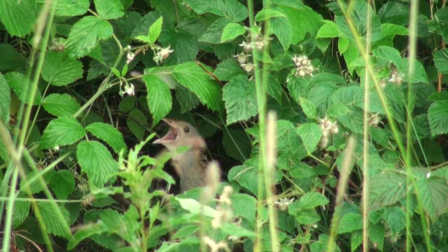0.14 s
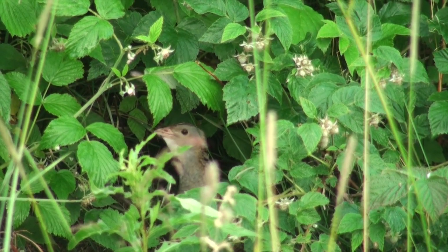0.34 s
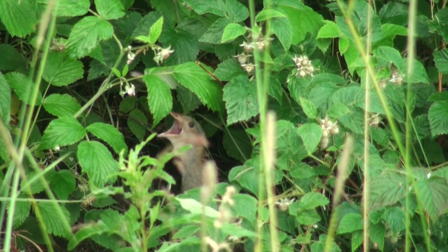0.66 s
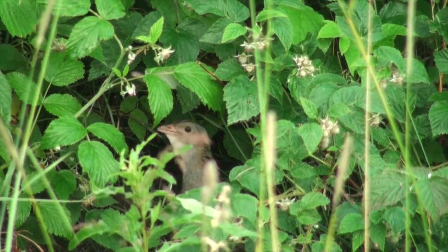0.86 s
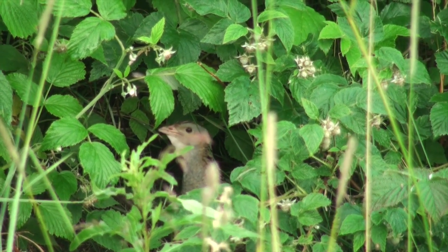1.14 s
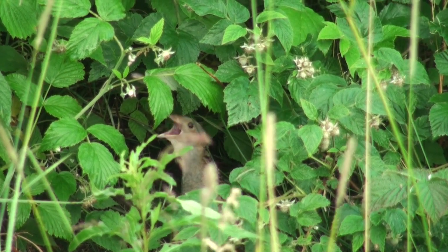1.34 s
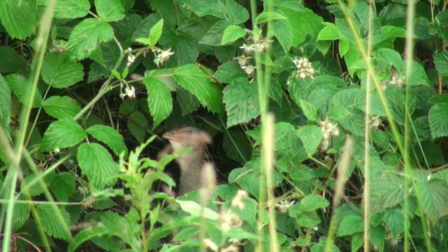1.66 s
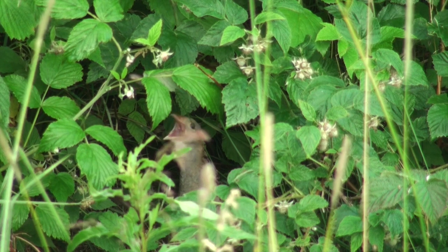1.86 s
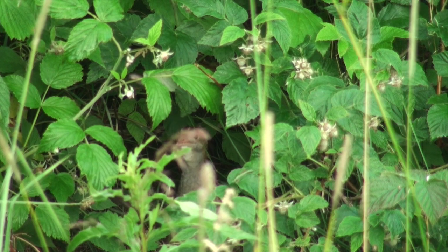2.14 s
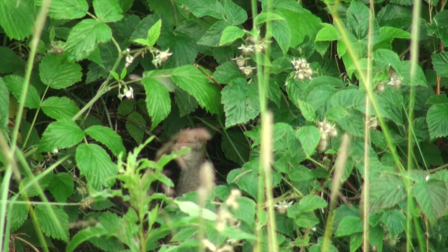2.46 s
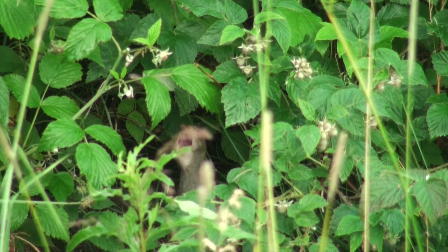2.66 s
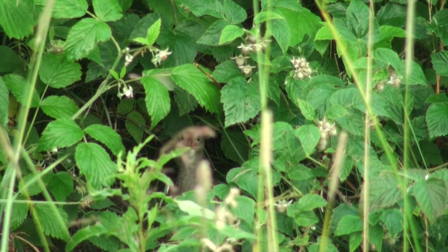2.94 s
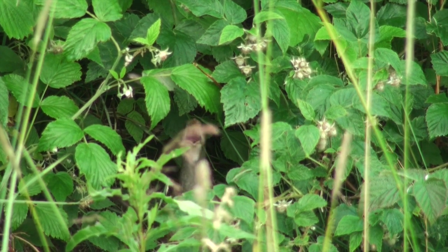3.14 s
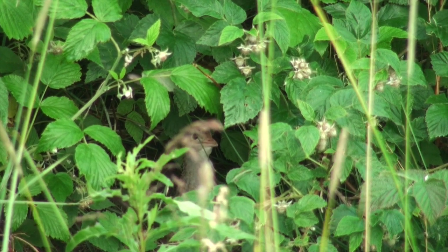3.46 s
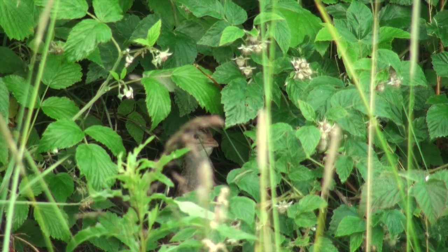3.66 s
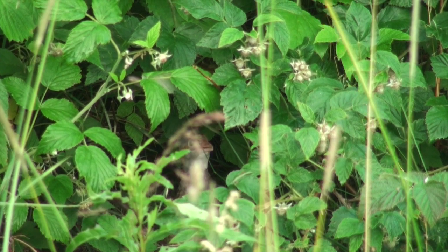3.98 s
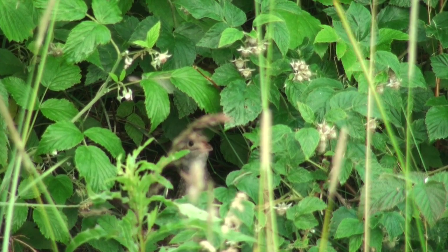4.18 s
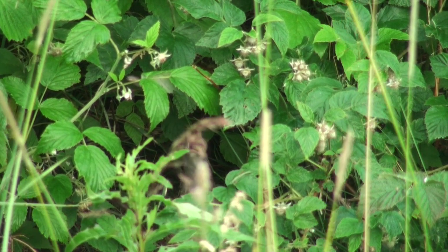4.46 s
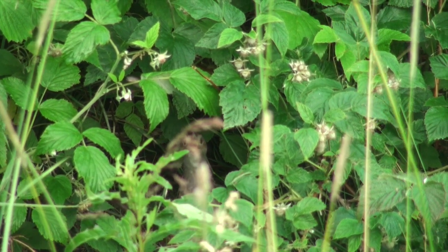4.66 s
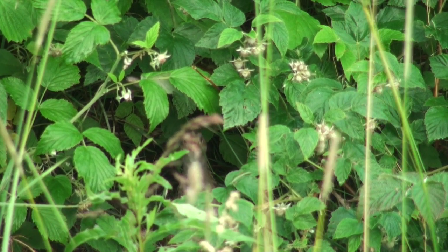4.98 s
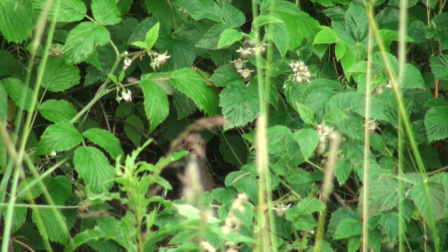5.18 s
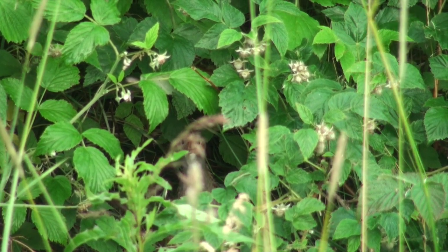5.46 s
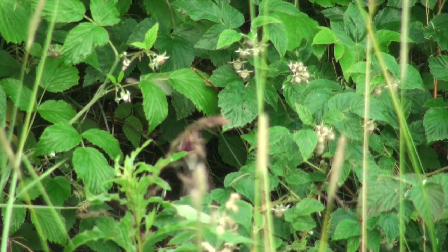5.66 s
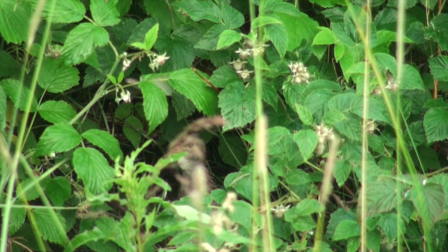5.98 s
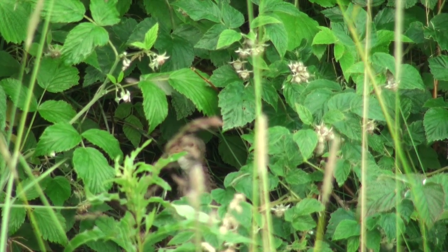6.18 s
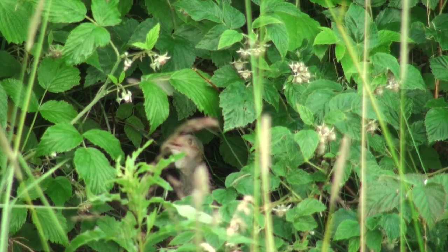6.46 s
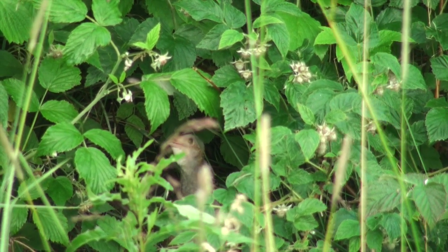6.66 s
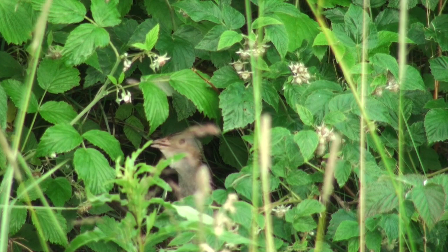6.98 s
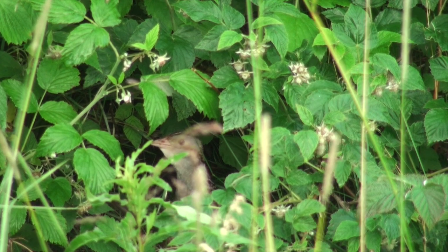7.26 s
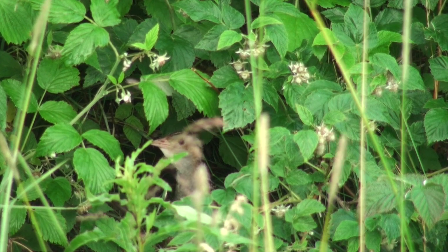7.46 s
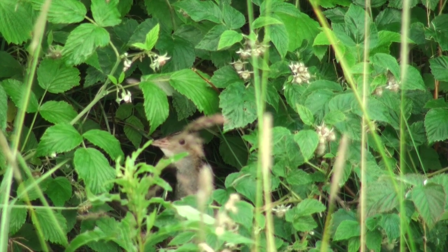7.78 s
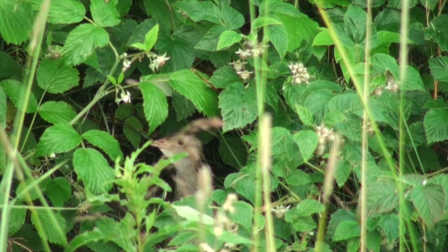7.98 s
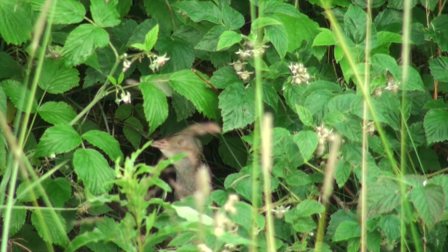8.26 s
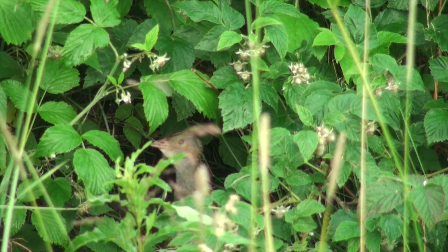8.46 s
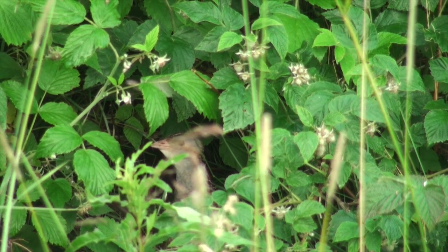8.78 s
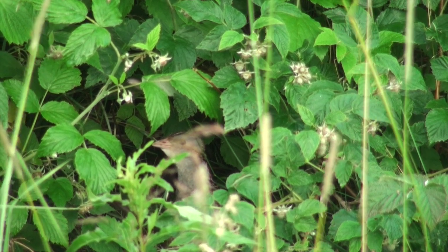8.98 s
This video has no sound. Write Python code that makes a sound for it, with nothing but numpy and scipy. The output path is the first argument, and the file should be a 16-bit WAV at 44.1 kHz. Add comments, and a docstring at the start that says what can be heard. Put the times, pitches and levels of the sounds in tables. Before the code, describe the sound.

A corncrake hidden in brambles gives loud, dry, comb-like rasps in pairs, about two every second and a quarter. A second one far across the meadow rasps in similar pairs, faint and smeared. From about two seconds a small songbird twitters softly in the distance, pauses, then returns near the end. The close bird stops shortly after seven seconds, leaving the far bird and a gently rising haze. Close outdoor microphone, centred birds.

```python
"""Over a faint haze that swells late, a far-off corncrake rasps in doubles, smeared by the meadow grass.
Close by, a second corncrake soon joins in with its own double call from a bramble thicket.
Its rasps are limping runs of about 120 pulses a second: a sharp snap on top of a few swings of the
syrinx (the bird's voice organ), scattered by leaves.
Later a small songbird twitters in the distance with gliding whistles, trills and soft falling notes."""
import sys
import numpy as np
from scipy import signal
from scipy.io import wavfile
from scipy.ndimage import uniform_filter1d

SR = 44100
rng = np.random.default_rng(int(sys.argv[2]) if len(sys.argv) > 2 else 0)


def to_wav(s):
    """Save 16-bit WAV."""
    ch = np.atleast_2d(s).T  # columns
    pcm = np.round(np.clip(ch, -1, 1) * 32767)  # PCM
    wavfile.write(sys.argv[1], SR, pcm.astype(np.int16))


N = 402191  # length in samples


def amp(db):
    """Turns decibels into a gain."""
    return 10 ** (np.asarray(db) / 20)


def evened(x):
    """Scales a sound to rms 1."""
    return x / np.sqrt(np.mean(x ** 2) + 1e-20)


def add(mix, start_s, sound):
    """Mixes a sound in at its start time; what runs past the end is cut off."""
    part = mix[max(round(start_s * SR), 0):][:len(sound)]
    part += sound[:len(part)]


def colour(x, points, size=2048):
    """Filters to an outline of (pitch_hz, level_db) points, with no ringing ahead of the sound."""
    points_hz, points_db = np.transpose(points)
    grid_hz = abs(np.fft.fftfreq(size, 1 / SR))
    outline_db = np.interp(np.log(grid_hz + 1), np.log(points_hz), points_db)
    log_gain = np.log(amp(outline_db))
    # The Hilbert transform supplies the phase that makes the filter respond only after its input.
    taps = np.fft.ifft(np.exp(np.conj(signal.hilbert(log_gain)))).real
    return signal.oaconvolve(x, taps)[:len(x)]


def echoes(first_s, t60, length_s):
    """Dense random reflections, of total energy 1, that fade by 60 dB in t60 seconds."""
    t = np.arange(int(length_s * SR)) / SR
    fade = amp(-60 * t / t60)
    onset = np.clip((t - first_s) * SR / 10, 0, 1)  # rises over ten samples
    taps = rng.standard_normal(len(t)) * fade * onset
    return taps / np.linalg.norm(taps)


def haze(lift_db=3, side_db=-26, hum_hz=50, hum_db=-60.5):
    """Filtered noise, nearly alike on both sides, plus a far rush that rises late and a faint low hum."""
    # Tone of the distant wash: pitch_hz [Hz], relative level_db [dB per Hz]
    wash_tone = [(25, -15), (50, -8.5), (76, -10), (102, -7.5), (175, -13), (260, -7), (450, -3), (677, -6),
                 (1020, -7), (2280, -24), (3200, -15), (4610, -18.5), (7500, -26.5), (16000, -32.5)]
    # Loudness of the wash before the lift: time_s [s], level_db [dB]
    wash_loudness = [(0, -53.5), (1.3, -53), (2, -53), (3.2, -54), (5.7, -56.5), (9.12, -52)]
    # Tone of the far-off rush: pitch_hz [Hz], relative level_db [dB per Hz]
    rush_tone = [(150, -19.5), (400, -9.5), (600, -3.5), (1250, -5.5), (1900, -25.5), (5000, -31),
                 (15000, -49)]
    # Loudness of the rush: time_s [s], level_db [dB]
    rush_loudness = [(0, -69), (6.9, -63), (7.4, -53.5), (8.4, -50.5), (9.12, -50)]

    t = np.arange(N) / SR
    mid = evened(colour(rng.standard_normal(N), wash_tone, size=8192))
    side = evened(colour(rng.standard_normal(N), wash_tone, size=8192))
    # The side part has opposite signs left and right, which gives a little width.
    wash = mid + amp(side_db) * np.array([side, -side])
    wash = wash * amp(lift_db + np.interp(t, *np.transpose(wash_loudness)))

    rush = evened(colour(rng.standard_normal(N), rush_tone))
    rush = rush * amp(np.interp(t, *np.transpose(rush_loudness)))
    hum = amp(hum_db) * evened(np.sin(2 * np.pi * hum_hz * t))
    return wash + rush + hum


def pulse_times(count, rate, drag_s, phase=.86):
    """Pulses start hurried, fall into a limp with two long gaps in five, and drag at the end."""
    limp = .401  # cycles per pulse; phase is where the limp starts, in turns
    k = np.arange(round(count))
    sway_s = .0012 * np.minimum(k / 7, 1) ** 2 * np.sin(2 * np.pi * (limp * k + phase))
    hurry_s = .0026 * k / 2.2 * np.exp(1 - k / 2.2 - (k / 8) ** 2)
    return k / rate + sway_s - hurry_s + drag_s * np.exp(k - k[-1])


def rival(rate=118, call_s=.205, call_db=-40, swell_s=0.095, start_db=-7, direct=0.31, tail_db=-5):
    """Each far pulse is a noise burst: the grass takes the low notes and smears the rest."""
    # When the far bird's rasps begin, in pairs: start_s [s]
    call_starts = [.02, 0.698, 1.234, 1.914, 2.431, 3.107, 3.678, 4.408, 4.903, 5.531, 6.077, 6.682, 7.215,
                   7.896, 8.413, 9.049]
    # Tone left over after the distance: pitch_hz [Hz], relative level_db [dB per Hz]
    far_tone = [(1000, -39.5), (2000, -18), (2600, -30.5), (3300, -11.5), (3700, -17), (4200, -7.5),
                (5200, -6.5), (5700, -11.5), (6400, -0.5), (6900, -8), (7500, -19), (8300, -34.5),
                (12000, -49)]

    out = np.zeros(N)
    for start_s in call_starts:
        call = np.zeros(SR // 2)
        for at_s in pulse_times(call_s * rate, rate, drag_s=0.0044, phase=rng.random()):
            # The call swells to its middle and sinks again.
            effort_db = start_db * ((at_s - swell_s) / swell_s) ** 2
            burst = direct * echoes(first_s=0, t60=0.0052, length_s=1 / 20)
            burst += echoes(first_s=0.0028, t60=0.074, length_s=1 / 20)
            add(call, at_s, amp(effort_db) * burst)
        # Set each call's loudness as it will be after the far tone is applied.
        energy = np.sum(colour(call, far_tone) ** 2)
        add(out, start_s, amp(call_db) * call * np.sqrt(call_s * SR / energy))
    tail = signal.fftconvolve(out, echoes(first_s=0.0044, t60=0.65, length_s=1))[:N]
    return colour(out + amp(tail_db) * tail, far_tone)


def pulse(force, tension, syrinx_hz=915, glide_hz=290, swing_s=0.005, fullness=0.94, snap_hz=6100,
          snap_s=0.001, snap_width_s=0.00023, ping_hz=9800, ping_db=-17, rough_db=-27):
    """One opening of the syrinx: a few harmonic-rich swings that rise in pitch, a snap near their start."""
    # How strongly throat and open bill pass the harmonics: pitch_hz [Hz], level_db [dB]
    throat_tone = [(700, -15.5), (1050, -11.5), (1450, -12), (2080, 1.5), (2500, -10), (3100, -16),
                   (3600, -40), (4050, -14), (5000, -12), (6500, -23), (7600, -25.5), (10000, -27),
                   (14000, -55.5)]

    t = np.arange(320) / SR
    # Each pulse differs a little from the next.
    pitch, size, snap_pitch, snap_size, snap_phase = rng.standard_normal(5)
    age = np.minimum(t / swing_s, 1)
    hz = tension * (syrinx_hz + glide_hz * age) * (1 + .015 * pitch)
    wobble = 0.011 * evened(uniform_filter1d(rng.standard_normal(len(t)), 25))
    turns = np.cumsum(hz) / SR + wobble

    swings = np.zeros(len(t))
    for harmonic in range(1, 14):
        level_db = np.interp(harmonic * hz, *np.transpose(throat_tone))
        swings += amp(level_db) * np.cos(2 * np.pi * harmonic * turns)
    swings += amp(rough_db) * rng.standard_normal(len(t))
    swings *= abs(np.sin(np.pi * age)) ** fullness  # swells and dies within swing_s

    snap = np.cos(2 * np.pi * snap_hz * (1 + .025 * snap_pitch) * t + snap_phase)
    snap += amp(ping_db) * np.sin(2 * np.pi * ping_hz * t)
    snap *= np.exp(-((t - snap_s) / snap_width_s) ** 2 / 2)
    return swings * amp(size / 2) + force * snap * amp(snap_size)


def rasp(bush, count, rate, drag_s, rasp_db=-13.5, leaves_db=-9.5, snap_db=2, spent_db=-7, slack=0.16,
         rise=0.081, turn=0.71, low_cut_hz=730, high_cut_hz=11000):
    """A run of pulses; the head turns, so each rasp meets partly other leaves."""
    # Tone of what the leaves throw back: pitch_hz [Hz], relative level_db [dB]
    leaf_tone = [(400, -21.5), (1000, 2.5), (1500, -11.5), (2050, -1.5), (2600, -0.5), (3120, 13),
                 (3600, -12.5), (3950, 15), (4400, -2), (6500, 6.5), (7600, 8), (10000, 4), (15000, 16)]

    voice = np.zeros(SR // 3)
    times = pulse_times(count, rate, drag_s)
    for k, at_s in enumerate(times):
        # The later the last pulse, the lower and weaker it is.
        spent = drag_s * rate * (k == len(times) - 1)
        tension = 1.015 - rise * np.exp(-k / 5) - slack * spent
        force = amp(snap_db) * min((k + 1) / 3, 1)  # snaps grow over the first three pulses
        add(voice, at_s, amp(spent_db * spent) * pulse(force, tension))
    voice = signal.sosfilt(signal.butter(4, low_cut_hz, "highpass", fs=SR, output="sos"), voice)
    voice = signal.sosfilt(signal.butter(2, high_cut_hz, fs=SR, output="sos"), voice)

    leaves = bush + turn * echoes(first_s=0.0015, t60=0.049, length_s=1 / 10)
    scatter = signal.fftconvolve(voice, leaves / np.linalg.norm(leaves))[:len(voice)]
    voice = voice + amp(leaves_db) * colour(scatter, leaf_tone)
    return amp(rasp_db) * voice * np.sqrt(times[-1] * SR / np.sum(voice ** 2))


def corncrake(thicket_db=-21, echo_db=-31):
    """The near bird, the short ring of the thicket and a faint echo from the meadow's edge."""
    # The near bird's rasps: start_s [s], pulse count, rate [pulses per s], delay of last pulse [s]
    near_rasps = [(0.175, 21, 122.2, 0.0082), (0.6946, 24, 122.9, 0.0046), (1.429, 21, 122.9, 0.0034),
                  (1.9447, 24, 122.5, 0.0044), (2.6526, 22, 122.1, 0.0043), (3.1769, 24, 122.3, 0.0056),
                  (3.8931, 21, 121.2, 0.0075), (4.4052, 23, 123.0, 0.0035), (5.124, 18, 120.2, 0.0041),
                  (5.6449, 23, 122.4, 0.0044), (6.3599, 21, 120.6, 0.0078), (6.8619, 24, 121.9, 0.0033)]
    # Tone of the echoes from thicket and meadow: pitch_hz [Hz], relative level_db [dB]
    echo_tone = [(300, -30.5), (2000, -17), (3200, -4), (4500, 0), (6500, -4.5), (8000, -1), (15000, -14)]

    out = np.zeros(N)
    bush = echoes(first_s=0.0001, t60=0.03, length_s=1 / 10)  # leaves that every rasp meets
    for start_s, count, rate, drag_s in near_rasps:
        add(out, start_s, rasp(bush, count, rate, drag_s))
    space = amp(thicket_db) * echoes(first_s=0.0023, t60=0.028, length_s=1)
    space += amp(echo_db) * echoes(first_s=0.021, t60=1.0, length_s=1)
    return out + colour(signal.fftconvolve(out, space)[:N], echo_tone)


def whistle(length_s, first_hz, last_hz, level_db, trill=False):
    """A gliding sine; a trill also shakes a little unevenly in pitch and is louder on its upstrokes."""
    settle = 1.5  # power of the time left: the glide is fast at first, then settles
    trill_hz, trill_depth_hz, trill_throb_db = 61.9, 260, 2.5
    t = np.arange(int(length_s * SR)) / SR
    unevenness = .5 * evened(uniform_filter1d(rng.standard_normal(len(t)), 600))
    beat = 2 * np.pi * trill_hz * t + unevenness
    hz = last_hz + (first_hz - last_hz) * (1 - t / length_s) ** settle
    hz = hz + trill * trill_depth_hz * np.sin(beat)
    shape = signal.windows.tukey(len(t), .5) * amp(trill * trill_throb_db * np.cos(beat))
    return amp(level_db) * evened(np.sin(2 * np.pi * np.cumsum(hz) / SR) * shape)


def songbird(direct_db=-1.5, wet_db=-7, pitch_spread=0.24, length_spread=0.21, spread_db=2):
    """Slurs and trills stand out of a soft random twitter of falling notes, softened by the bushes."""
    # The clearest slurs: start_s [s], length_s [s], first_hz [Hz], last_hz [Hz], relative level_db [dB]
    clear_slurs = [(2.16, .051, 5040, 4070, -46), (2.277, .047, 3040, 1990, -54.5),
                   (2.336, 0.03, 3050, 1850, -54), (2.351, 0.034, 5700, 4640, -48.5),
                   (2.6, 0.055, 2320, 2150, -50), (2.888, 0.033, 5210, 3000, -38.5),
                   (3.473, 0.19, 2330, 2110, -55), (3.766, 0.015, 4240, 3140, -36),
                   (3.837, 0.015, 4480, 3450, -41.5), (4.1, 0.077, 3300, 3330, -42),
                   (4.16, 0.12, 3350, 2570, -51), (4.649, 0.058, 1990, 1616, -53),
                   (4.857, 0.063, 3580, 4500, -39), (7.729, .07, 4950, 5750, -54),
                   (7.803, 0.0246, 5460, 4380, -47), (7.889, 0.023, 4970, 3980, -41),
                   (8.173, 0.036, 4030, 3100, -43.5), (8.583, 0.03, 4535, 3435, -43),
                   (8.97, 0.018, 5660, 4520, -46.5)]
    # Trills: start_s [s], length_s [s], pitch_hz [Hz], relative level_db [dB]
    clear_trills = [(1.766, 0.042, 3910, -44.5), (2.838, .08, 3560, -50), (4.183, 0.05, 3730, -42.5),
                    (5.353, 0.073, 3450, -44), (7.679, 0.036, 4510, -45.5), (8.265, 0.086, 3550, -45)]
    # Phrases filled with softer twitter: start_s [s], end_s [s]
    twitter_spans = [(2.1, 6.7), (7.599, 9.1)]
    # Typical soft note: notes per s, first pitch, length, relative level, share of its pitch it drops
    notes_per_s, note_hz, note_s, note_db, fall = 5.6, 4920, .04, -49.5, 0.21

    out = np.zeros(N)
    for start_s, length_s, first_hz, last_hz, level_db in clear_slurs:
        add(out, start_s, whistle(length_s, first_hz, last_hz, level_db))
    for start_s, length_s, pitch_hz, level_db in clear_trills:
        add(out, start_s, whistle(length_s, pitch_hz, pitch_hz, level_db, trill=True))
    for phrase_s, end_s in twitter_spans:
        for k, (late, pitch, length, size) in enumerate(rng.uniform(-1, 1, (60, 4))):
            start_s = phrase_s + (k + late / 2) / notes_per_s
            first_hz = note_hz * np.exp(pitch_spread * pitch)
            length_s = note_s * np.exp(length_spread * length)
            if start_s < end_s:
                note = whistle(length_s, first_hz, first_hz * (1 - fall), note_db + spread_db * size)
                add(out, start_s, note)
    wet = signal.fftconvolve(out, echoes(first_s=.003, t60=0.33, length_s=.5))[:N]
    return amp(direct_db) * out + amp(wet_db) * wet


def scene():
    """The haze spreads slightly to both sides; all three birds are heard in the middle."""
    return haze() + rival() + corncrake() + songbird()


def record(dry, ceiling=1.0, edge_hz=16000):
    """Rounds off loud peaks, adds the soft thud of an uneven overload, then cuts the highest treble."""
    # Tone of the thud: pitch_hz [Hz], level_db [dB]
    thud_tone = [(2, -27.5), (6, -3), (25, -13.5), (60, -31), (120, -33.5), (230, -19.5), (400, -27.5),
                 (1500, -85)]

    # Squaring the sound follows its bursts of loudness; the filter keeps mostly the low part.
    thud = colour(dry.mean(0) ** 2, thud_tone, size=32768)
    rounded = dry / (1 + (dry / ceiling) ** 8) ** (1 / 8)
    band_limit = signal.firwin(511, edge_hz, window=("kaiser", 9), fs=SR)
    return signal.oaconvolve(rounded + thud, band_limit[None], "same")


dry = scene()
out = record(dry)
to_wav(out)
```